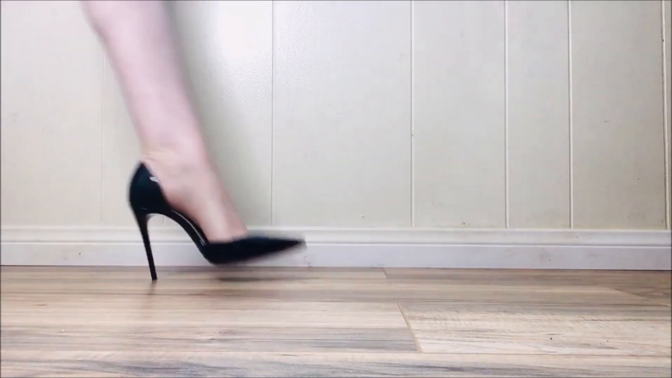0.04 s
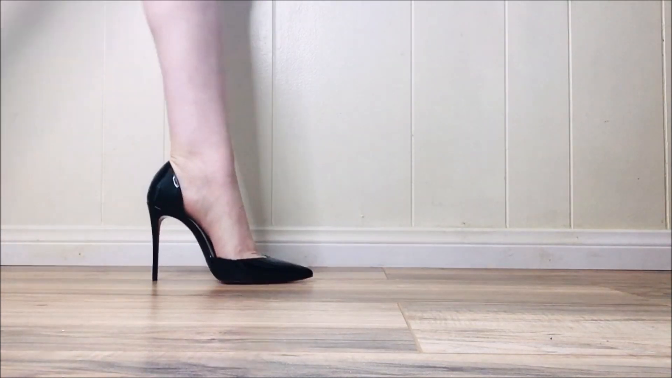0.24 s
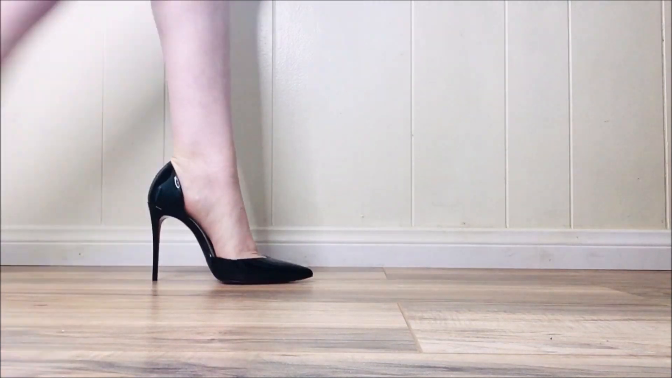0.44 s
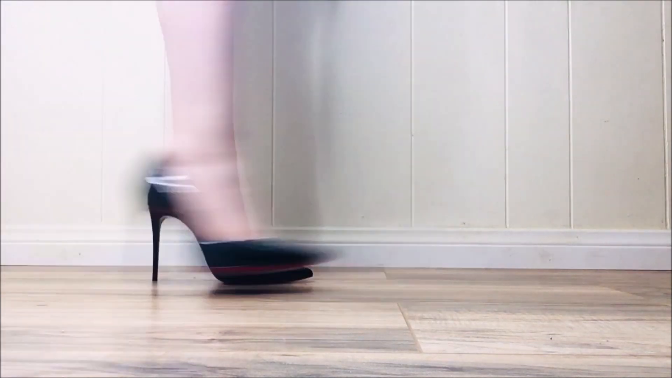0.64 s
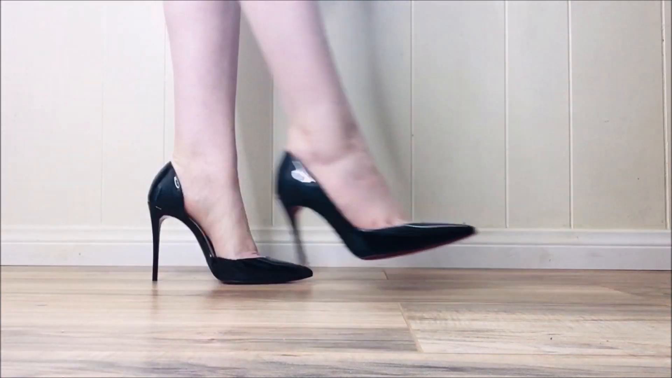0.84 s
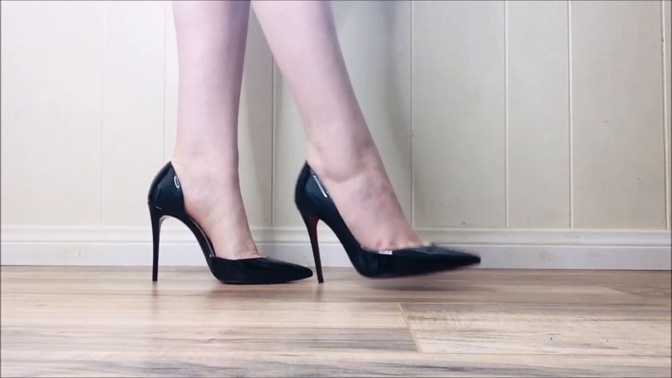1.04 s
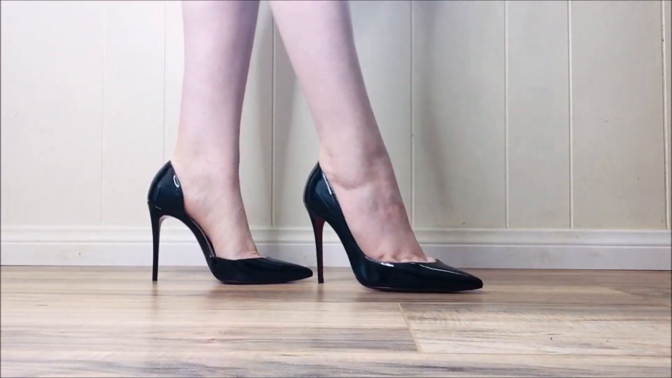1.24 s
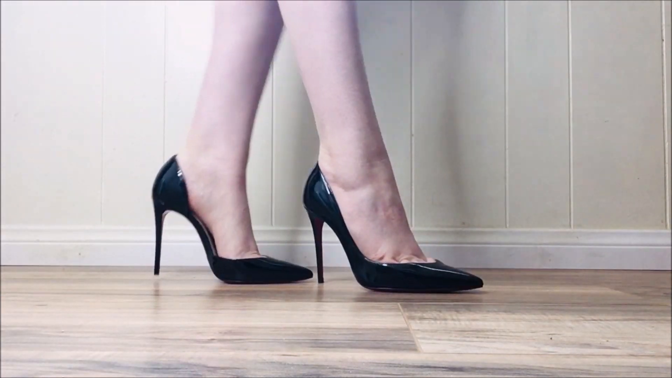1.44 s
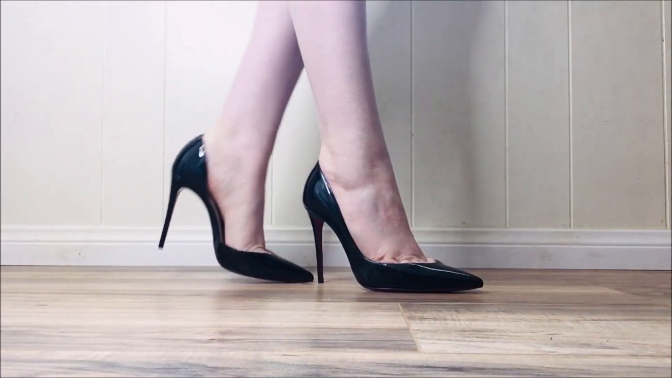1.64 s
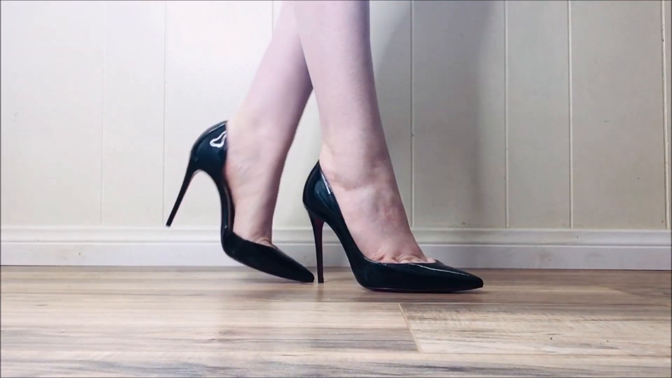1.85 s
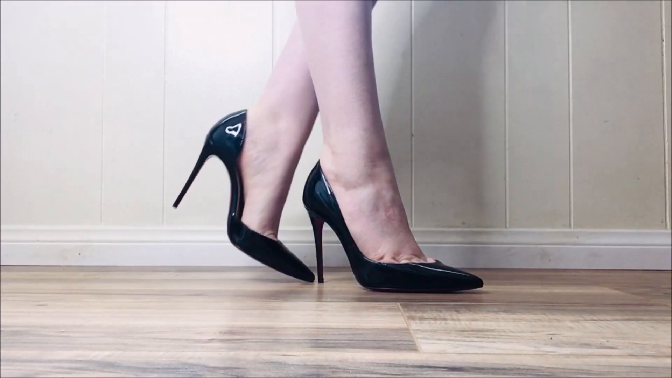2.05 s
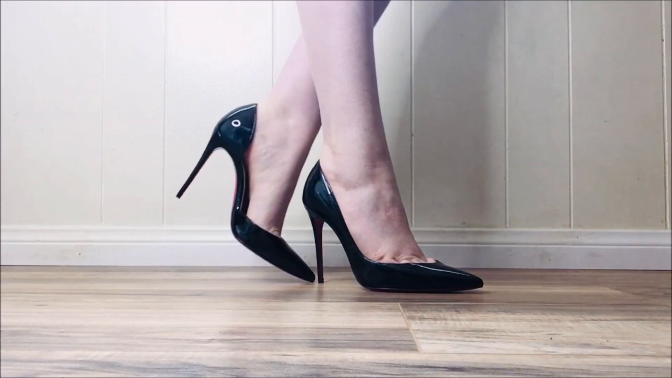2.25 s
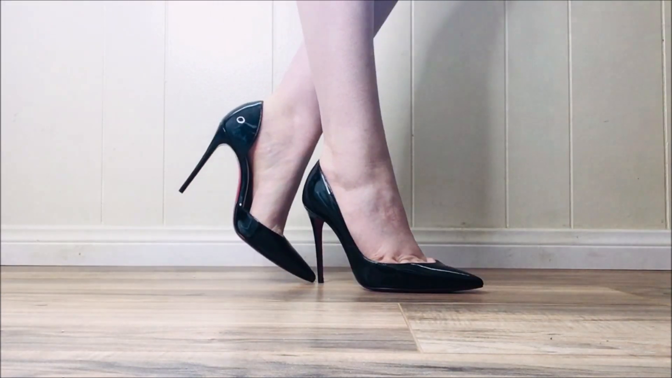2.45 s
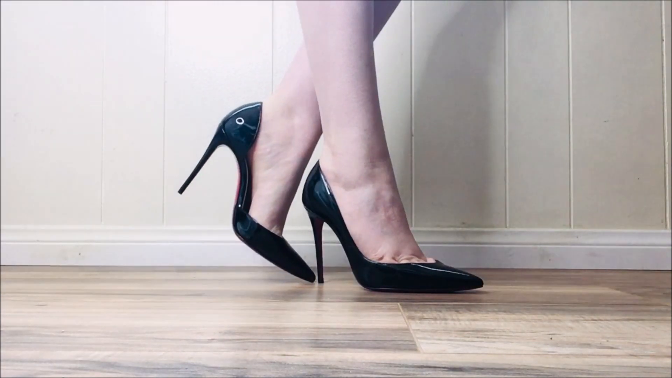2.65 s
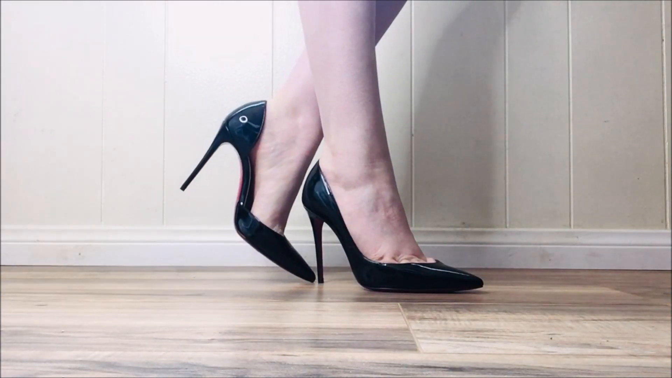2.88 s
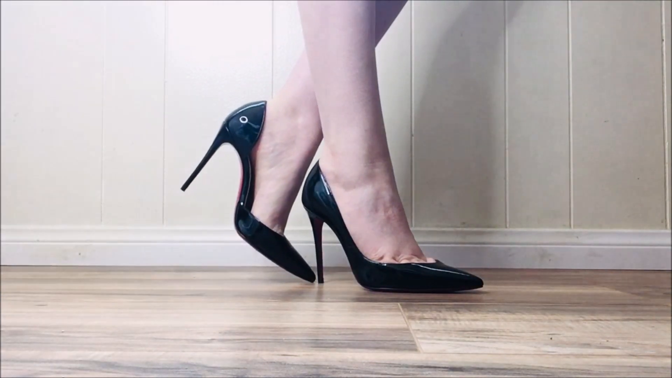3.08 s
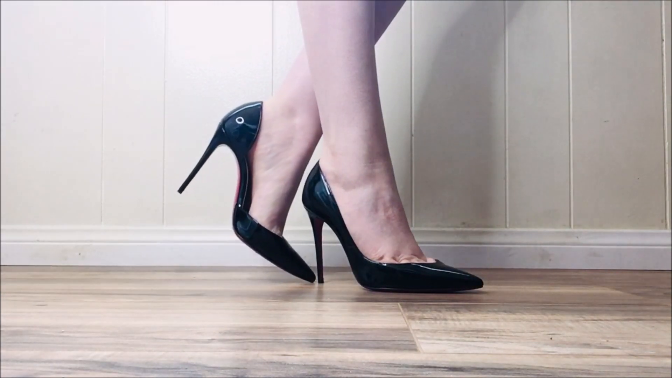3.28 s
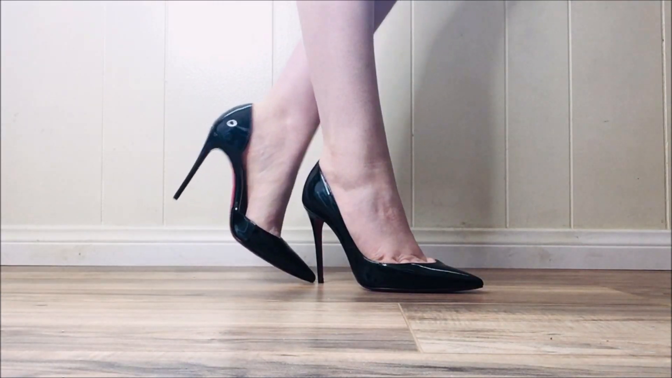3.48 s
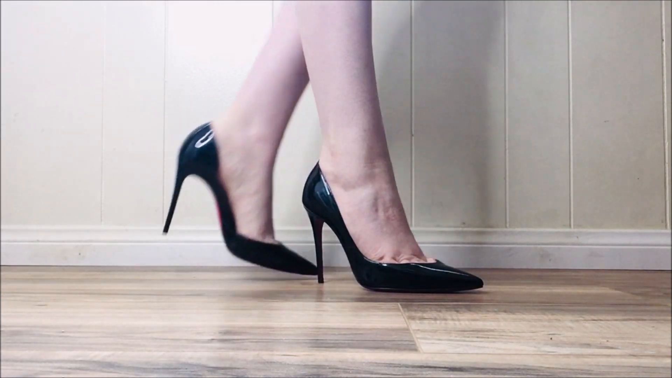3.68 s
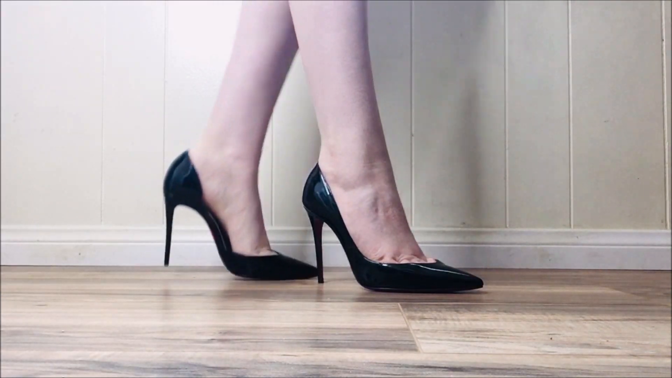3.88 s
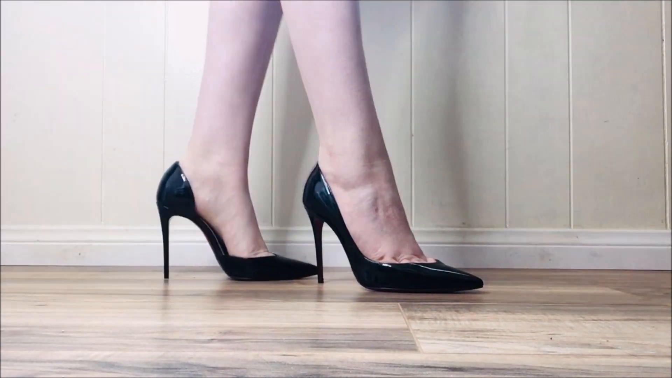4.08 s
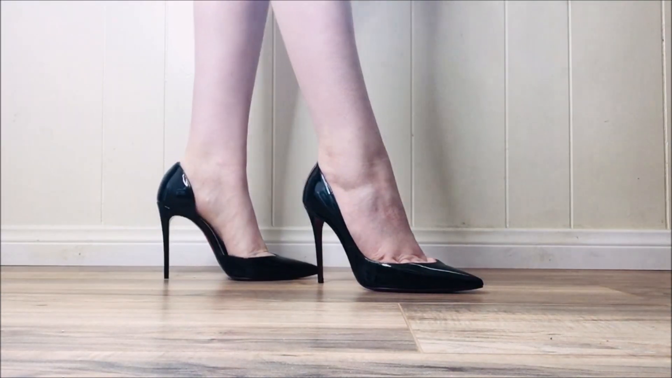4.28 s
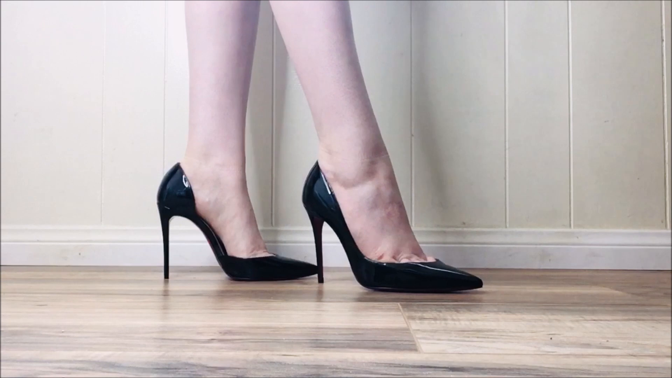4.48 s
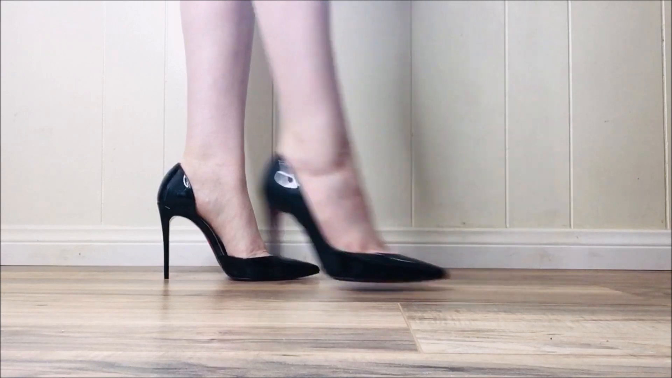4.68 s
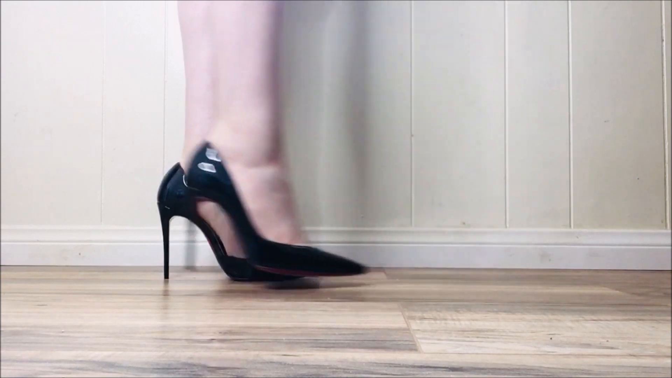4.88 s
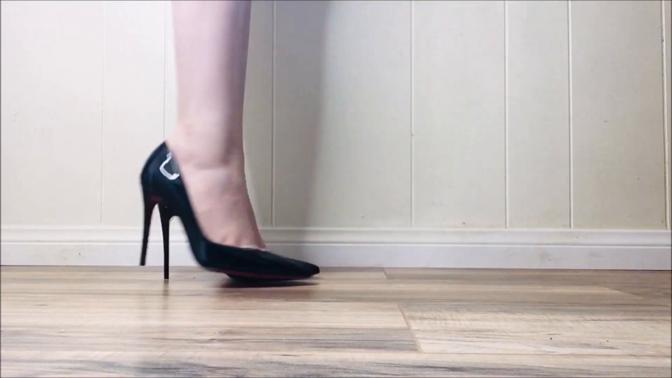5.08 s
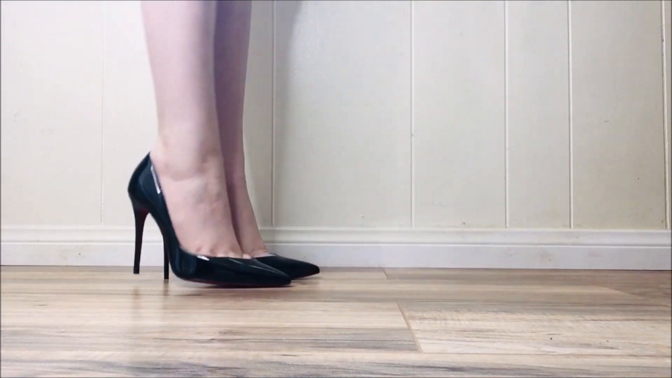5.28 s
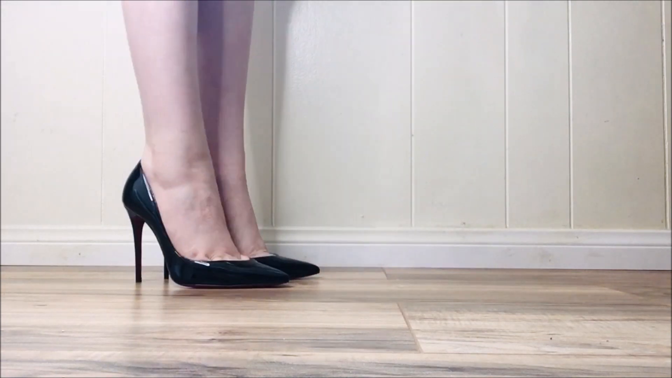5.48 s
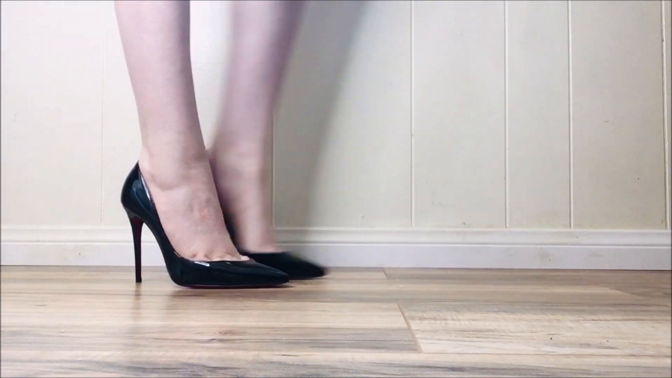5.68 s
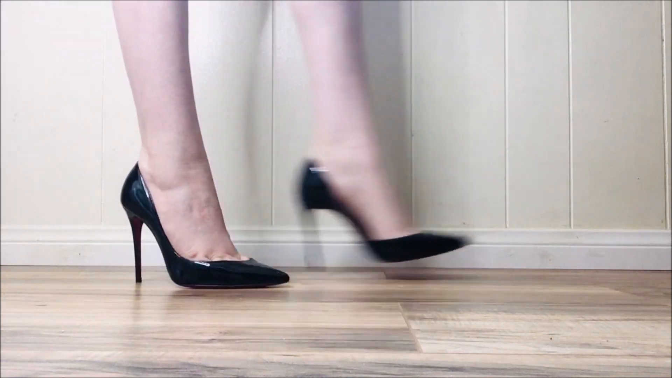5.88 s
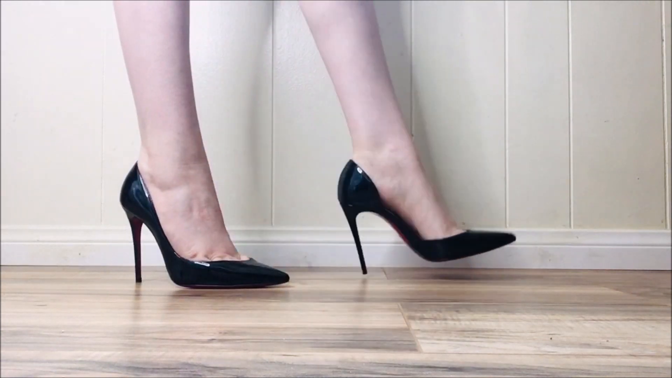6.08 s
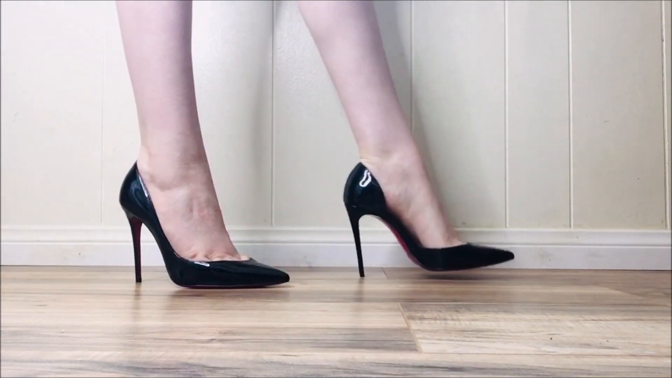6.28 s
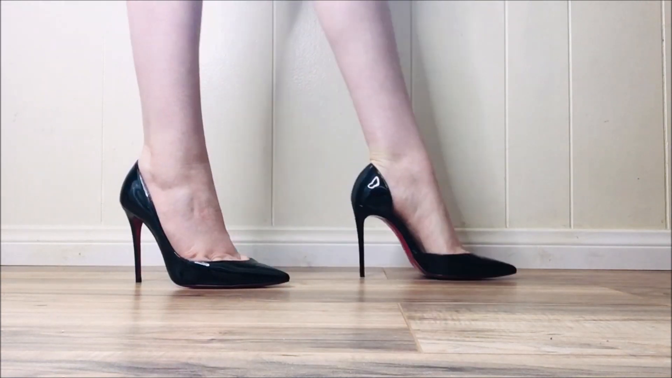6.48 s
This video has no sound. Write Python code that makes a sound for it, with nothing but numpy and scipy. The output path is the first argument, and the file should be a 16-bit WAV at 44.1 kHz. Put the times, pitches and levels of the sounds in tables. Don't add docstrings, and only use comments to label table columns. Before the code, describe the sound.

Stiletto heels step on hard planks, heard close to the boards in a small quiet room. Two quick hard knocks open, then a firm step with a softer follow-up after a second. Tiny ticks and creaks fill a long near-silent pause, then a pair of knocks, a light tap, a small cluster and one final softer step. Low house rumble, faint motor hum and microphone hiss lie beneath.

```python
import sys
import numpy as np
from scipy import signal
from scipy.fft import rfft, irfft
from scipy.io import wavfile
from scipy.ndimage import uniform_filter1d

SR = 44100
rng = np.random.default_rng(int(sys.argv[2]) if len(sys.argv) > 2 else 0)


def wav_record(signal):
    frames = np.transpose(np.atleast_2d(signal))
    bounded = np.clip(frames, -1, 1)
    quanta = np.round(bounded * 32767).astype(np.int16)
    wavfile.write(sys.argv[1], SR, quanta)


def volts_from_decibels(level):
    exponent = np.asarray(level, float) / 20
    return 10 ** exponent


N = 287973

SIZE, LEAD = 16384, 1024
HZ = np.maximum(np.arange(SIZE // 2 + 1) * SR / SIZE, 1)
T = np.arange(SIZE) / SR


def colour(table, hz, column=1):
    table = np.array(table, float)
    return np.interp(np.log(hz), np.log(table[:, 0]), table[:, column])


def bell(hz, centre_hz, octaves):
    return np.exp(-(np.log2(hz / centre_hz) / max(octaves, 0.2)) ** 2 * 2)


def fade(t60):
    return np.exp(-np.log(1000) * T / max(t60, 1e-3))


def unit(spectrum):
    x = np.roll(irfft(spectrum), LEAD)[:SIZE * 3 // 4]
    x[:LEAD] *= np.hanning(2 * LEAD)[:LEAD]
    return x / np.abs(x).max()


def add(out, sound, s, peak_db):
    start = int(s * SR) - LEAD
    n = min(len(sound), N - start)
    out[start:start + n] += sound[:n] * volts_from_decibels(peak_db)


def room(build_s=0.0011):
    # f/Hz, tail level/dB, t60/s
    reverb = [(78.5, -11, 0.13), (166, -16, 0.37), (400, -20, 0.21), (1000, -13.5, 0.18),
              (3000, -7.5, 0.13), (8040, -15.5, 0.19)]
    noise = rfft(rng.standard_normal(SIZE))
    response = 1.0
    for hz in 60 * 2 ** np.arange(0, 8.1, 0.5):
        shape = fade(colour(reverb, hz, column=2)) * (1 - np.exp(-(T / build_s) ** 2))
        band = irfft(noise * bell(HZ, hz, octaves=0.75)) * shape / np.sqrt(np.sum(shape ** 2))
        response = response + volts_from_decibels(colour(reverb, hz)) * rfft(band)
    return response


def blow(contact_ms, hard_db, joint_ms):
    # f/Hz, level/dB
    arrival = [(30, -62.5), (50, -17.5), (120, 4), (160, 8), (200, 4), (410, -7), (630, -20), (1360, -31),
               (2100, -36.5), (3500, -31), (9000, -82)]
    # f/Hz, level/dB, t60/s
    boards = [(151, -24, 0.14), (208.7, 13, 0.14), (308.7, 10, 0.12), (410, -11.5, 0.046), (585, -17, 0.2),
              (645, -14.5, 0.17)]

    spread_s, power, slowest_hz, turns = 0.00978, 1.183, 140, 0.086
    lag = spread_s * (160 / np.maximum(HZ, slowest_hz)) ** power
    travel = np.exp(-2j * np.pi * (np.cumsum(lag) * SR / SIZE + turns))

    push = volts_from_decibels(hard_db * np.log2(HZ / 200)) / (1 + (HZ * contact_ms / 1000) ** 4)

    echo = np.clip((1.74 / joint_ms) ** 1.1, 0, 1)
    push = push * (1 - echo * np.exp(-2j * np.pi * HZ * joint_ms / 1000))

    ring = np.zeros(SIZE)
    for hz, db, t60 in boards:
        louder, sharper = rng.standard_normal(2)
        mode = np.sin(2 * np.pi * hz * (1 + 0.03 * sharper) * T)
        ring += volts_from_decibels(db + 1.9 * louder) * mode * fade(t60)
    bass_cut = HZ ** 2 / (HZ ** 2 + 80 ** 2)
    late = rfft(np.roll(ring, int(0.00933 * SR))) * push * bass_cut
    wave = volts_from_decibels(colour(arrival, HZ)) * travel * push * room()
    return unit(wave) + volts_from_decibels(-14) * unit(late)


def steps(out):
    # t/s, peak level/dB, contact/ms, hardness/dB per octave, delay to the plank joint and back/ms
    firm = [(0.11, -10.5, 0.45, -0.5, 4.02), (0.229, -16, 0.36, 1, 3.57), (1.109, -16.5, 2.36, 2, 4.14),
            (1.280, -30, 1.13, 2, 3.7), (3.880, -27, 0.71, 6, 1.9), (4.083, -14.5, 0.73, 1.5, 3.96),
            (4.587, -39, 0.99, 4.5, 3.93), (5.3243, -33, 0.84, 6.5, 2.03), (5.422, -42, 0.85, 3.5, 2.1),
            (5.495, -20.5, 0.74, 3.5, 4.3), (6.246, -26, 2.9, 7, 4.3)]
    for s, db, contact_ms, hard_db, joint_ms in firm:
        add(out, blow(contact_ms, hard_db, joint_ms), s, db)


def taps(out):
    # t/s, peak level/dB, hardness/dB per octave
    touches = [(1.343, -48, 5), (3.12, -50, 9.5), (4.060, -42.5, 6.5), (4.163, -53.5, 21), (4.483, -55, -4),
               (4.644, -50, -3.5), (5.407, -40, -11), (5.659, -46, -6), (5.752, -53, -2),
               (5.813, -52.5, -1.5), (6.102, -47.5, 8), (6.351, -53, 3)]
    for s, db, hard_db in touches:
        add(out, blow(contact_ms=1.08, hard_db=hard_db, joint_ms=4.54), s, db)


def woody_ring(hz, t60_ms):
    ring = np.sin(2 * np.pi * hz * T) * fade(t60_ms / 1000) * (1 - fade(0.0069))
    return unit(rfft(ring) * room())


def knocks(out):
    # t/s, peak level/dB, f/Hz, t60/ms
    stems = [(0.111, -31, 572, 26), (0.113, -42, 374, 33), (0.229, -33.5, 827, 23), (0.232, -34.5, 601, 65),
             (4.084, -29.5, 573, 22), (1.109, -23.5, 375, 8.7), (1.110, -30, 490, 10),
             (1.2805, -33, 588, 21), (1.280, -32.5, 364, 25), (3.881, -49, 1094, 51),
             (4.082, -37, 1000, 16), (5.3255, -39, 762, 17), (5.3283, -28.5, 227, 31),
             (5.424, -39.5, 223, 30), (1.126, -35.5, 369, 52), (5.497, -27.5, 397, 11),
             (6.246, -42.5, 370, 92)]
    for s, db, hz, t60_ms in stems:
        add(out, woody_ring(hz, t60_ms), s, db)


def snaps(out):
    # t/s, peak level/dB, f/Hz
    tips = [
        (0.229, -55, 1880),
        (1.109, -29.5, 1110),
        (1.281, -49, 2220),
        (1.281, -39.5, 1100),
        (3.880, -39, 1880),
        (6.247, -44, 1080),
    ]
    for s, db, hz in tips:
        add(out, woody_ring(hz, t60_ms=3.1), s, db)


def free_rings(out):
    # t/s, peak level/dB, f/Hz
    loose = [(1.692, -59, 664), (1.692, -56, 1460), (1.767, -60, 1460), (2.328, -53.5, 1210),
             (2.328, -58.5, 2400), (3.119, -59, 610), (4.484, -64.5, 620), (4.587, -55, 760),
             (4.588, -51.5, 2840), (4.597, -59, 1540), (5.4235, -56, 794), (5.497, -60, 647),
             (5.659, -52.5, 554), (5.661, -63, 1040), (6.102, -55, 705), (6.352, -63, 660)]
    for s, db, hz in loose:
        add(out, woody_ring(hz, t60_ms=14 * 1000 / hz), s, db)


def tick(hz, octaves, length_ms, crack=0.83):
    slips = rng.standard_normal(SIZE) * fade(3.24 * length_ms / 1000)
    slips[0] += crack
    return unit(rfft(slips) * bell(HZ, hz, octaves) * room())


def clicks(out):
    # t/s, peak level/dB, centre f/Hz, length/ms
    grit = [(0.110, -41, 4130, 3.4), (0.125, -46.5, 3320, 1.1), (0.229, -32, 4050, 3.8),
            (0.23, -62, 9300, 2.1), (1.108, -56, 3400, 19), (1.279, -48.5, 4800, 3.2),
            (3.118, -48, 2750, 2.8), (3.607, -60, 400, 1.3), (3.880, -56, 4400, 7.7),
            (4.0555, -46.5, 5480, 4.4), (4.056, -50, 8250, 1.6), (4.082, -48.5, 4240, 3.5),
            (4.163, -67, 3950, 2.1), (4.558, -65, 7000, 5.4), (4.586, -53.5, 3950, 3),
            (4.594, -52, 3000, 8.0), (5.495, -51.5, 3160, 1.8), (6.103, -54.5, 3500, 1.4),
            (6.246, -65, 4500, 2.8), (6.357, -55.5, 3220, 3.4)]
    for s, db, hz, length_ms in grit:
        octaves = min(0.93 * (4000 / hz) ** 1.7, 1.6)
        add(out, tick(hz, octaves, length_ms), s, db)


def leather(out):
    # t/s, peak level/dB, centre f/Hz, length/ms
    creaks = [(0.199, -58, 4450, 5.8), (0.212, -58, 5030, 20), (0.262, -52.5, 3300, 13),
              (0.217, -56, 1000, 9.0), (0.31, -51, 2130, 5.3), (0.404, -53, 2130, 6),
              (0.405, -54.5, 8000, 7.9), (1.395, -56, 280, 18), (1.432, -57, 300, 14),
              (1.581, -55, 1090, 2.7), (1.692, -49, 3000, 1.1), (1.768, -56, 2480, 2.1),
              (2.198, -63, 5500, 4.7), (2.204, -55.5, 5500, 10), (2.206, -58, 1800, 7.9),
              (2.328, -51, 2500, 4.8), (4.482, -61, 3960, 4.1), (5.656, -57, 4500, 3.6),
              (5.664, -56.5, 4860, 11)]
    for s, db, hz, length_ms in creaks:
        add(out, tick(hz, 1.93, length_ms), s, db)


def walk(rate):
    hold = int(SR / rate)
    levels = np.repeat(rng.standard_normal(N // hold + 1), hold)
    return uniform_filter1d(uniform_filter1d(levels, hold), hold)[:N]


def quiet():
    # f/Hz, density level/dB per Hz
    noise_floor = [(15, -64.5), (25, -23), (43, -16), (64, 2.5), (86, -7.5), (101, -1), (119, 1.5),
                   (204, -12.5), (233, -18), (259, -14.5), (482, -28), (522, -27), (847, -30.5),
                   (5420, -35.5), (15500, -43.5)]
    # f/Hz, width/Hz, rms level/dB
    motor = [
        (52.7, 15, -69),
        (117.6, 11, -76.5),
        (226.6, 14, -75),
    ]
    hz = np.maximum(np.arange(N // 2 + 1) * SR / N, 1)
    air = rfft(rng.standard_normal(N)) * volts_from_decibels(colour(noise_floor, hz)) / (1 + (hz / 17000) ** 4)
    low = 1 / (1 + (hz / 350) ** 4)
    rumble = irfft(air * low, N) * volts_from_decibels(0.5 * walk(8.1))
    hiss = irfft(air * (1 - low), N) * volts_from_decibels(0.047 * walk(0.95))
    out = rumble + hiss
    out *= volts_from_decibels(-59.5) / out.std()
    for centre_hz, width_hz, db in motor:
        resonance = 1 / (1 + (2 * (hz - centre_hz) / width_hz) ** 2)
        line = irfft(rfft(rng.standard_normal(N)) * resonance, N)
        out += volts_from_decibels(db) * line / line.std()
    return out


def scene():
    out = quiet()
    for layer in (steps, taps, knocks, free_rings, snaps, clicks, leather):
        layer(out)
    return out[None]


def band_limit(x):
    return signal.sosfilt(signal.butter(12, 15610, fs=SR, output="sos"), x)


def record(dry):
    bass_cut = signal.butter(2, 35, "high", fs=SR, output="sos")
    heard = signal.sosfilt(bass_cut, -dry)
    return band_limit(heard)


dry = scene()
out = record(dry)
wav_record(out)
```